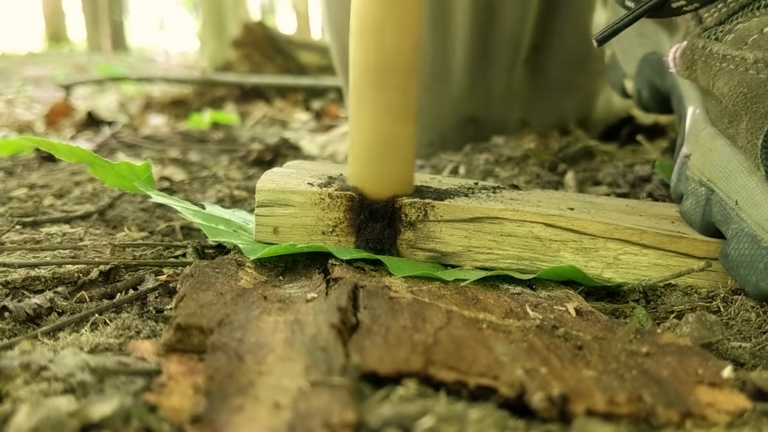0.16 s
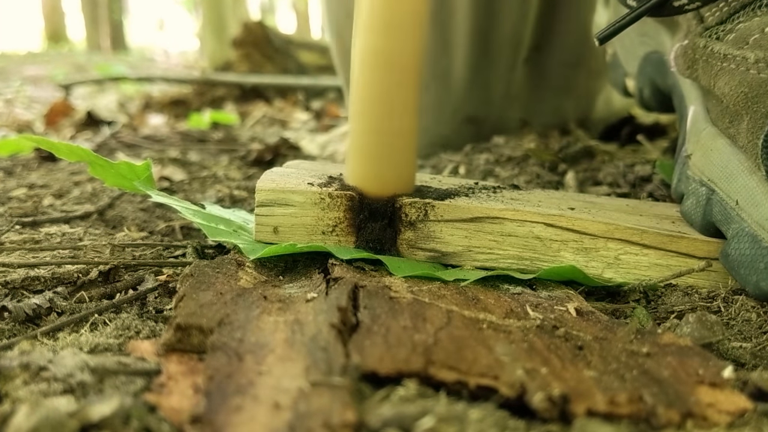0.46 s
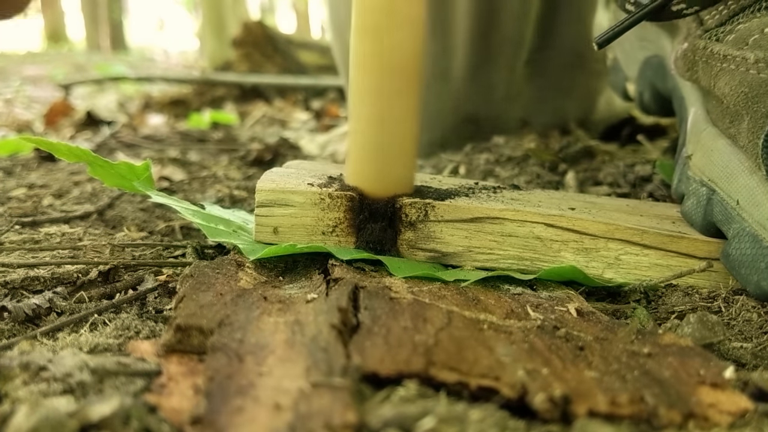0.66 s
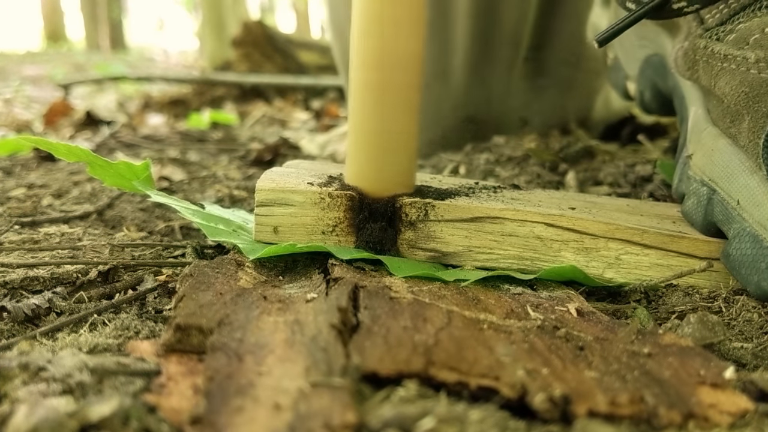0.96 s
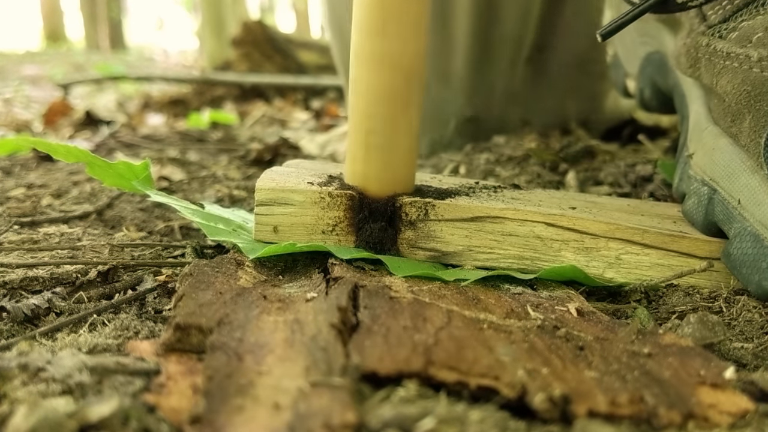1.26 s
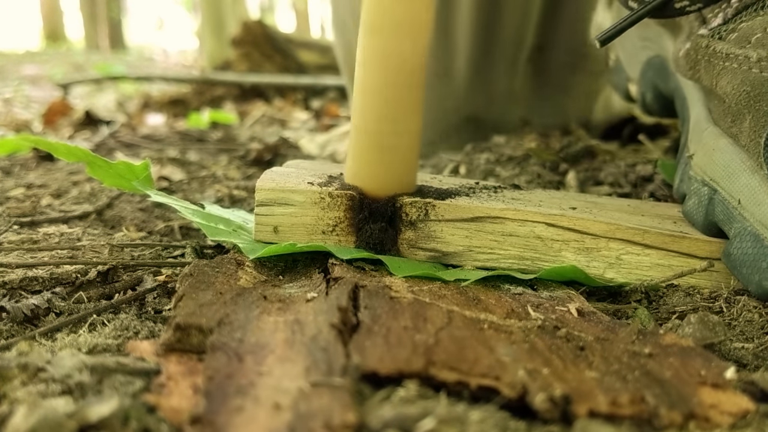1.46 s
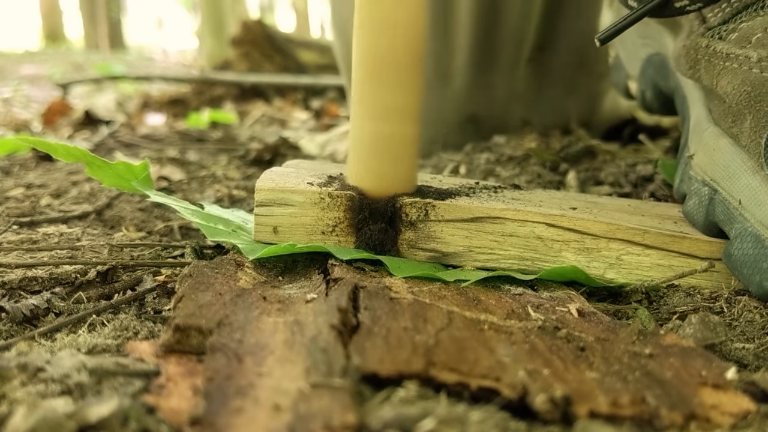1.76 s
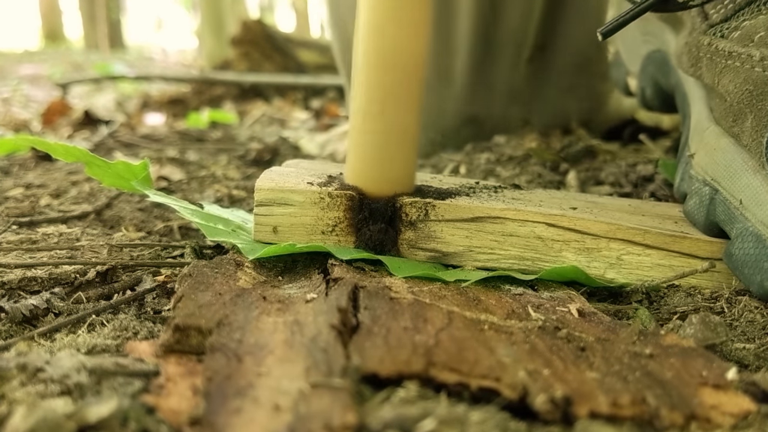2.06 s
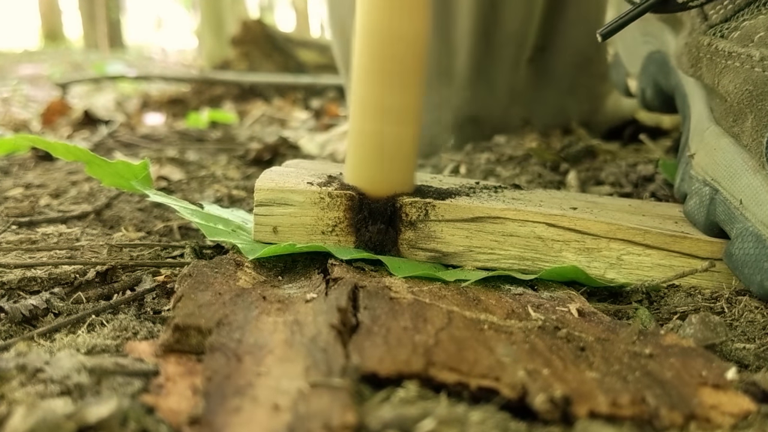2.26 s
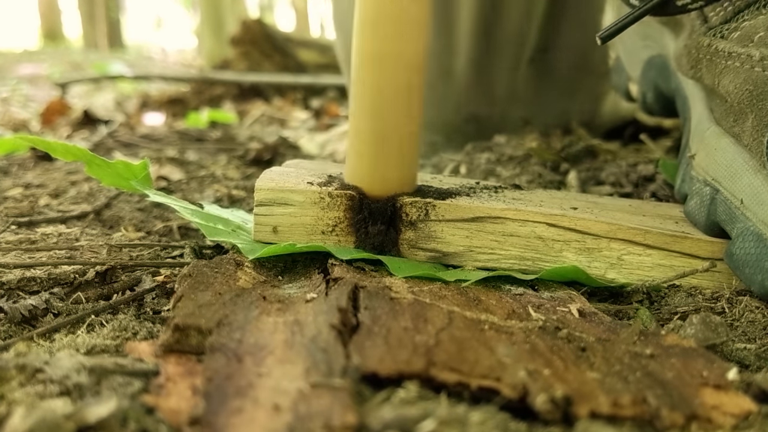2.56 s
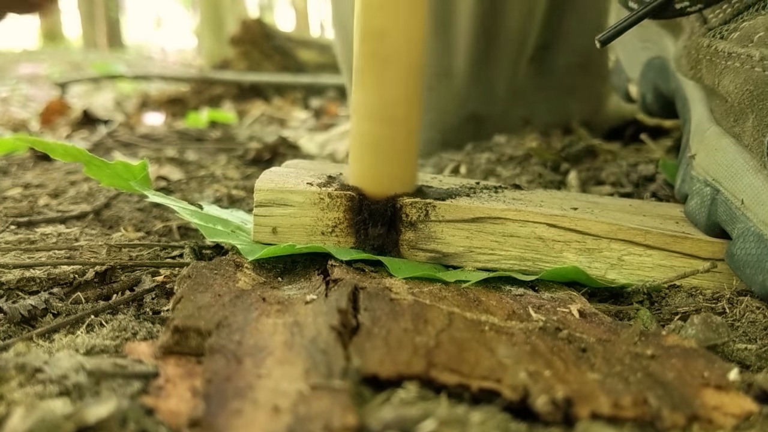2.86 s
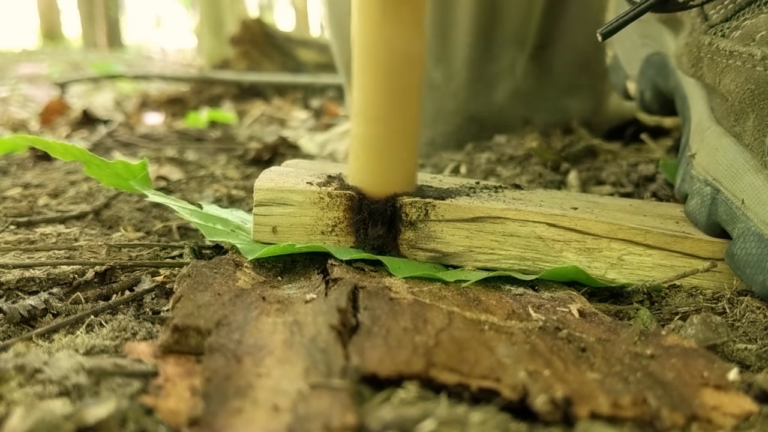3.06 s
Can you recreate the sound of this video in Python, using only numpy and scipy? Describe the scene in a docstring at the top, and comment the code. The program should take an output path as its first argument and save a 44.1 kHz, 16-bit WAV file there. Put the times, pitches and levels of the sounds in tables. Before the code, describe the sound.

A wooden spindle scrapes back and forth in a wooden board, close and dry, nearly mono. Strokes last about 0.18 seconds throughout: bright rasps with a thin chattering squeak alternate with broader, steadier ones. Small woody clicks mark many turns, strongest near 0.28 seconds. Low grumble follows each stroke; soft sagging thuds recur, strongest around 2.1. Barely audible whistles at 1.6 and 2.1 over quiet forest air.

```python
"""Dry wooden rasps come and go in quick alternation, heard close by: a bow drill on the forest floor.
A spindle spins to and fro in the charred socket of a board; tiny random slips, coloured as wood on char,
swell and die with its speed, and pulls add a thin chattering squeak. Damped modes click, mostly at the turns.
The board grumbles, soft low thuds sag in pitch, and two faint whistles sound over quiet air."""
import sys
import numpy as np
from scipy import signal
from scipy.fft import rfft, irfft, next_fast_len
from scipy.io import wavfile
from scipy.ndimage import uniform_filter1d, map_coordinates

SR = 44100
rng = np.random.default_rng(int(sys.argv[2]) if len(sys.argv) > 2 else 0)


def wav_record(signal):
    """Record a signal, one row per channel, as 16-bit PCM in the file named by sys.argv[1]."""
    frames = np.transpose(np.atleast_2d(signal))
    bounded = np.clip(frames, -1, 1)
    # unit amplitude maps onto the largest positive 16-bit level
    quanta = np.round(bounded * 32767).astype(np.int16)
    wavfile.write(sys.argv[1], SR, quanta)


N = 142002  # length in samples

# Bow pulls: start/s, cord taut/s, end/s, rasp level/dB, squeak level/dB,
# fastest moment [share of the time from taut to end]
PULLS = [(-.12, -0.115, 0.074, -0.5, -1, 0.76), (0.28, .29, 0.46, -0.5, 1.5, 0.56),
         (.663, 0.663, 0.83, 0, -1.5, 0.53), (1.028, 1.031, 1.203, 0, 0.5, 0.51),
         (1.392, 1.401, 1.578, -.5, 0, 0.46), (1.76, 1.767, 1.924, 0, 0, 0.49),
         (2.134, 2.134, 2.302, -0.5, -2, 0.56), (2.517, 2.523, 2.702, 0, 1, 0.52),
         (2.878, 2.888, 3.05, 0, 2, .5)]
# Bow pushes: start/s, cord taut/s, end/s, rasp level/dB, fastest moment [share of the time from taut to end]
PUSHES = [(.1, 0.109, 0.2752, 0, 0.54), (0.475, .488, .653, 0, 0.59), (.846, 0.853, 1.013, -0.5, 0.59),
          (1.204, 1.219, 1.39, 0, .43), (1.574, 1.587, 1.757, 0.5, 0.63), (1.94, 1.948, 2.135, -0.5, 0.37),
          (2.315, 2.325, 2.507, -.5, 0.5), (2.705, 2.707, 2.877, 0.5, 0.43),
          (3.057, 3.073, 3.253, 0.5, 0.45)]

TURNS_PER_S = 31  # spindle at full speed
CREEP, BREAKAWAY_S = 0.16, 0.0082  # speed while the cord takes up its slack; time to reach it


def amp(db):
    """Decibels to gain."""
    return 10 ** (np.asarray(db) / 20)


def unit(x):
    """x at rms 1."""
    return x / np.sqrt(np.mean(x ** 2) + 1e-20)


def along(points, hz):
    """Values at hz, read between (f/Hz, value) points on a log frequency axis."""
    f, v = np.transpose(points)
    return np.interp(np.log(hz + 1), np.log(f + 1), v)


def filtered(x, response):
    """x with its spectrum multiplied by a response of frequency."""
    m = next_fast_len(N + 8192)  # padded
    hz = np.fft.rfftfreq(m, 1 / SR)
    return irfft(rfft(x, m) * response(hz), m)[..., :N]


def coloured(x, spectrum):
    """x shaped by (f/Hz, level/dB) points, at rms 1."""
    return unit(filtered(x, lambda hz: amp(along(spectrum, hz))))


def wobble(rate):
    """A smooth random curve through rate knots a second."""
    knots = rng.standard_normal(int(N * rate / SR) + 4)
    return map_coordinates(knots, [np.arange(N) * rate / SR])


def speed(start, taut, end, fastest):
    """Spindle speed 0-1 in one stroke: it creeps until the cord is taut, then runs through an arch to rest."""
    t = np.arange(N) / SR
    top = taut + fastest * (end - taut)
    arch = np.sin(np.pi * np.interp(t, [taut, top, end], [0, 0.5, 1])).clip(0)
    creep = CREEP * np.interp(t, [start, start + BREAKAWAY_S, top], [0, 1, 0])
    return np.maximum(arch, creep)


def stroke_speeds(strokes):
    """One spindle speed curve for each stroke."""
    return [speed(*row[:3], row[-1]) for row in strokes]


def fibres(pace, slips_per_s, size_db, turn_db, clump_db, clump_rate):
    """Tiny slips of wood on char: denser at speed, in clumps, and stronger once a turn."""
    chance = np.clip(slips_per_s * (0.3 + pace) / SR, 0, 1)
    hits = rng.random(N) < chance
    sizes = rng.standard_normal(N) * amp(size_db * rng.standard_normal(N))
    slips = hits * sizes / np.sqrt(chance)  # even power at any density
    angle = 2 * np.pi * (np.cumsum(pace) * TURNS_PER_S / SR + rng.random())
    return slips * amp(turn_db * np.sin(angle) + clump_db * wobble(clump_rate))


def pulls():
    """A bright rasp; near full speed the spindle chatters in a narrow squeak."""
    # Colour of the pull rasp: f/Hz, level/dB
    pull_colour = [(300, -48), (650, -26), (950, -17), (1550, -22), (2000, -18.5), (2850, -18),
                   (3600, -8.5), (4250, -9.5), (4650, -5), (5250, -5.5), (5950, -11.5), (6950, -10),
                   (7600, -3.5), (8400, -0.5), (8850, -7), (9300, -6.5), (9600, -15.5), (10000, -13),
                   (10700, -21.5), (12200, -31.5), (15500, -33.5)]
    # Narrow band of the squeak: f/Hz, level/dB
    squeak_colour = [(6500, -35), (7300, -4), (7850, 10), (8300, -10), (8800, -12), (9600, -35)]
    rasp_db, rasp_grows = -36, 0.93  # level at full speed; loudness as a power of speed
    squeak_db, squeak_grows = -39.5, 3.8

    speeds = stroke_speeds(PULLS)
    pace = sum(speeds)
    rasp_swell = sum(amp(row[3]) * v ** rasp_grows for row, v in zip(PULLS, speeds))
    squeak_swell = sum(amp(row[4]) * v ** squeak_grows for row, v in zip(PULLS, speeds))
    slips = fibres(pace, slips_per_s=16000, size_db=-1.5, turn_db=1.5, clump_db=-0.6, clump_rate=380)
    chatter = fibres(pace, slips_per_s=6300, size_db=-1.0, turn_db=2.2, clump_db=3.5, clump_rate=270)
    rasp = amp(rasp_db) * rasp_swell * coloured(slips, pull_colour)
    squeak = amp(squeak_db) * squeak_swell * coloured(chatter, squeak_colour)
    return rasp + squeak


def shifting(x, depth_db):
    """The colour of the rubbing drifts at random as the contact wanders round the socket."""
    z = signal.stft(x, nperseg=256)[2]
    field = rng.standard_normal(z.shape)
    field = uniform_filter1d(field, size=3, axis=0)  # smooth over frequency
    field = uniform_filter1d(field, size=22, axis=1)  # smooth over time
    return signal.istft(z * amp(depth_db * unit(field)), nperseg=256)[1][:N]


def pushes():
    """A broader, steadier rasp as the spindle spins the other way."""
    # Colour of the push rasp: f/Hz, level/dB
    push_colour = [(300, -27), (620, -20), (850, -11.5), (1550, -15.5), (2100, -12), (3000, -6.5),
                   (3600, -0.5), (4300, -4.5), (4800, -1.5), (5400, -2), (6100, -9), (6900, -5), (7800, -1),
                   (8500, .5), (9300, -1), (9650, -10), (10100, -14), (10700, -19.5), (12200, -27.5),
                   (15500, -29.5)]
    rasp_db, rasp_grows = -36, 0.9  # level at full speed; loudness as a power of speed

    speeds = stroke_speeds(PUSHES)
    swell = sum(amp(row[3]) * v ** rasp_grows for row, v in zip(PUSHES, speeds))
    slips = fibres(sum(speeds), slips_per_s=16000, size_db=1.0, turn_db=1.5, clump_db=0.5, clump_rate=600)
    return amp(rasp_db) * swell * coloured(shifting(slips, depth_db=1.3), push_colour)


def ring(modes, scatter_db):
    """One short ring of damped wooden modes, each a decaying cosine, with peak 1."""
    contact_s = 0.0001  # time constant of the attack
    t = np.arange(SR // 20) / SR
    x = np.zeros(len(t))
    for hz, db, t60 in modes:
        decay = amp(db + scatter_db * rng.normal() - 60 * t / t60)
        x += decay * np.cos(2 * np.pi * hz * t)
    x = x * (1 - np.exp(-t / contact_s))
    return x / np.abs(x).max()


def clicks():
    """The spindle jumps across the socket and rings itself, the board and the socket's rim."""
    # Knocks in the socket, peaks ahead of the band filter:
    # t/s, spindle tick level/dB, board knock level/dB, socket rim level/dB
    socket_knocks = [(0.0377, -29, -27.5, -33), (0.0856, -40, -36, -43), (0.089, -45, -40, -56),
                     (.283, -8, -16, -19.5), (.4757, -19, -49, -43), (.8399, -26, -57, -44),
                     (0.8478, -27, -34, -44), (1.0268, -25, -21, -21), (1.2138, -18, -33.5, -39),
                     (1.3959, -21, -46, -52), (1.5795, -22, -46, -45), (2.8811, -29, -44, -38),
                     (3.0585, -36, -44, -48), (3.0638, -21, -34.5, -39)]
    # Modes of the spindle, the board and the socket's rim: f/Hz, relative level/dB, t60/s
    spindle_modes = [(3880, -11.5, 0.0045), (5680, -4.5, 0.0034), (6140, -4.5, 0.0038), (7920, -0.5, 0.003),
                     (8490, -1.5, 0.0052)]
    board_modes = [(774, -13, 0.0048), (1012, -10.5, 0.021), (1440, 0.5, 0.0047), (1846, 3, 0.0048),
                   (3670, -3.5, 0.0082)]
    rim_modes = [(2960, 7, 0.0076), (3270, 12, 0.0038)]
    click_band_hz = (530, 9300)  # band edges f/Hz: the clicks are heard only within this band

    out = np.zeros(N + SR)
    for s, *levels in socket_knocks:
        bodies = zip(levels, (spindle_modes, board_modes, rim_modes))
        x = sum(amp(db) * ring(modes, scatter_db=1.04) for db, modes in bodies)
        out[round(s * SR):][:len(x)] += x
    band = signal.butter(4, click_band_hz, "bandpass", fs=SR, output="sos")
    return signal.sosfilt(band, out[:N])


def ground(x, wet_db, t60):
    """A faint, short scatter off the ground and the leaf litter: a decaying noise tail."""
    t = np.arange(SR // 4) / SR
    tail = rng.standard_normal(len(t)) * amp(-60 * t / t60)
    return x + amp(wet_db) * signal.fftconvolve(x, tail / np.linalg.norm(tail))[:N]


def grind():
    """The board grumbles under every stroke: low noise that follows the spindle's speed."""
    # Colour of the board's low grumble: f/Hz, level/dB
    grumble_colour = [(25, -33), (52, 0.5), (110, -4), (170, -3.5), (260, -10.5), (380, -10.5), (480, -20),
                      (1000, -38.5)]
    grind_db, grind_grows = -49.5, 1  # level at full speed; loudness as a power of speed
    pace = sum(stroke_speeds(PULLS + PUSHES))
    return amp(grind_db) * pace ** grind_grows * coloured(rng.standard_normal(N), grumble_colour)


def thuds():
    """The work sends soft low bumps of a few cycles each through the ground, sagging in pitch."""
    # Thuds: time of the swell's peak t/s, level/dB, pitch there f/Hz
    ground_bumps = [(.367, -41.5, 68), (0.427, -32.5, 70.6), (.597, -31.5, 70.6), (.953, -36, 72.5),
                    (1.586, -41.5, 79), (1.696, -32, 65), (1.768, -41, 66), (1.903, -39.5, 62.7),
                    (2.037, -31, 70.6), (2.135, -27.5, 93.2), (2.19, -42, 62), (2.393, -40, 64),
                    (2.615, -40, 69.5), (2.895, -32, 60.2), (2.989, -35, 73.84)]
    rise_s, fall_s, sag_per_s = 0.012, 0.02, 9.4  # swell, fade, share of its pitch lost a second
    out = np.zeros(N)
    for s, db, hz in ground_bumps:
        t = np.arange(N) / SR - s
        swell = np.exp(-(t / np.where(t < 0, rise_s, fall_s)) ** 2)
        cycles = hz * t * (1 - sag_per_s * t / 2) + rng.random()
        out += amp(db) * swell * np.sin(2 * np.pi * cycles)
    return out


def whistles():
    """Brief steady sine tones under bell-shaped swells, in the lulls between strokes."""
    # Faint thin whistles: centre t/s, length/s, f/Hz, peak level/dB
    thin_tones = [(1.588, 0.053, 2650, -59), (2.12, .075, 2002, -58.5)]
    t = np.arange(N) / SR
    out = np.zeros(N)
    for s, length, hz, db in thin_tones:
        swell = np.exp(-(2 * (t - s) / length) ** 2)
        out += amp(db) * swell * np.sin(2 * np.pi * hz * t)
    return out


def air():
    """Quiet forest air: steady noise, strongest in the bass."""
    # Colour of the air: f/Hz, level/dB
    air_colour = [(20, -38), (45, 5.5), (65, 6), (110, -10), (250, -17.5), (500, -23), (1000, -20),
                  (2000, -25.5), (4000, -29.5), (9000, -42), (15000, -44)]
    return amp(-54.5) * coloured(rng.standard_normal(N), air_colour)


def scene():
    """The drill over quiet forest air, almost mono; a faint quarter-cycle-shifted side gives the width."""
    # Stereo width: f/Hz, side over mid level/dB
    width = [(300, -73), (1200, -54), (2500, -39.5), (5000, -66), (9000, -67), (13000, -39)]
    click_side_db = 15  # extra clicks in the side feed: a little wider than the rasp

    knocks = clicks()
    drill = ground(pulls() + pushes() + knocks, wet_db=-20.5, t60=0.075)
    mid = drill + grind() + thuds() + whistles() + air()
    side_feed = mid + amp(click_side_db) * knocks
    side = filtered(side_feed, lambda hz: 1j * amp(along(width, hz)))
    return np.array([mid + side, mid - side])


def record(dry):
    """A steep band limit: nothing passes from 15.9 kHz up."""
    return filtered(dry, lambda hz: hz < 15900)


dry = scene()
out = record(dry)
wav_record(out)
```